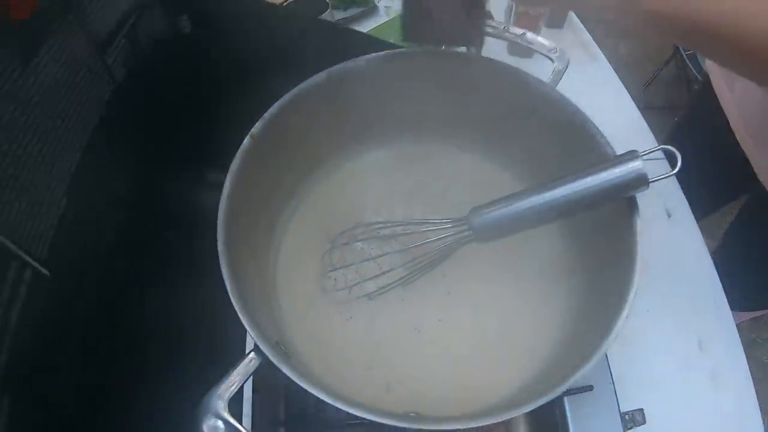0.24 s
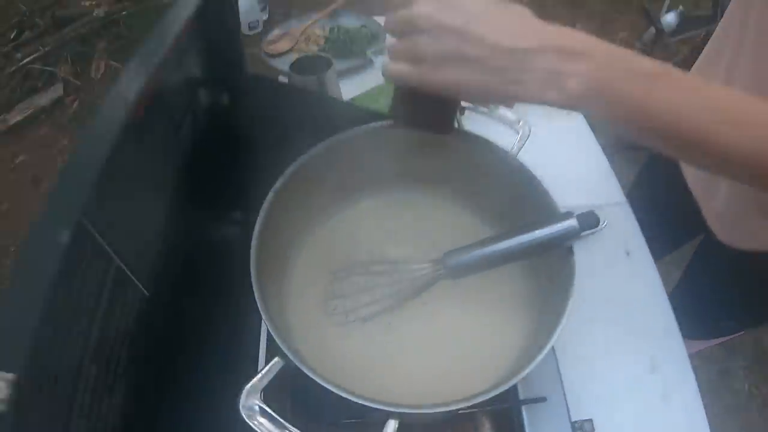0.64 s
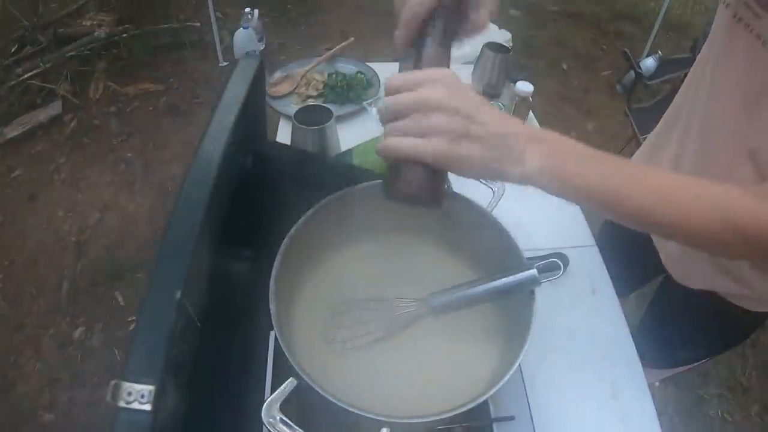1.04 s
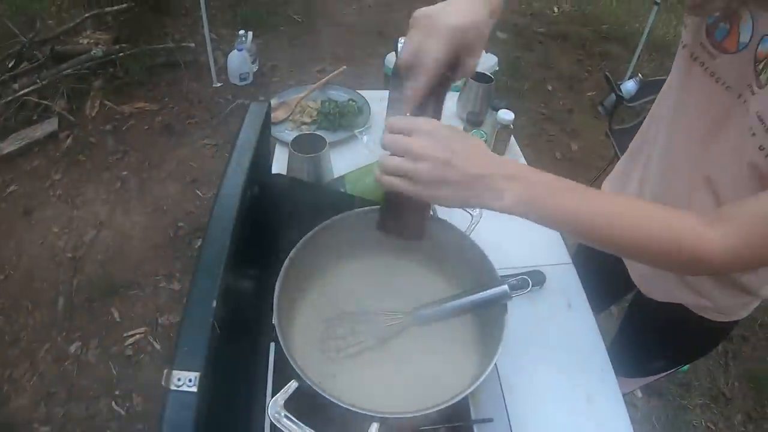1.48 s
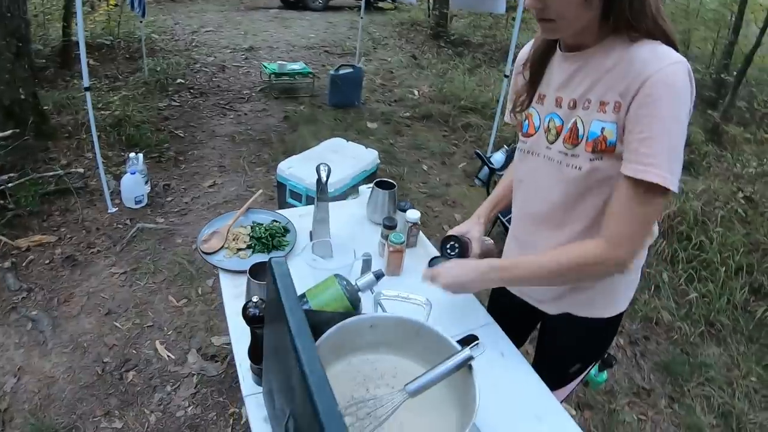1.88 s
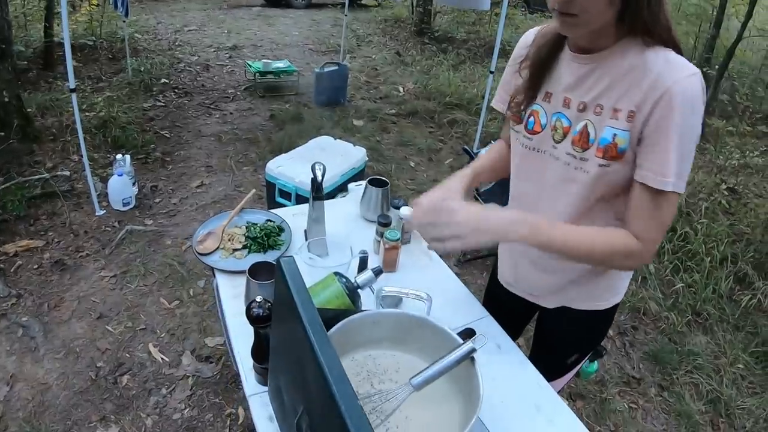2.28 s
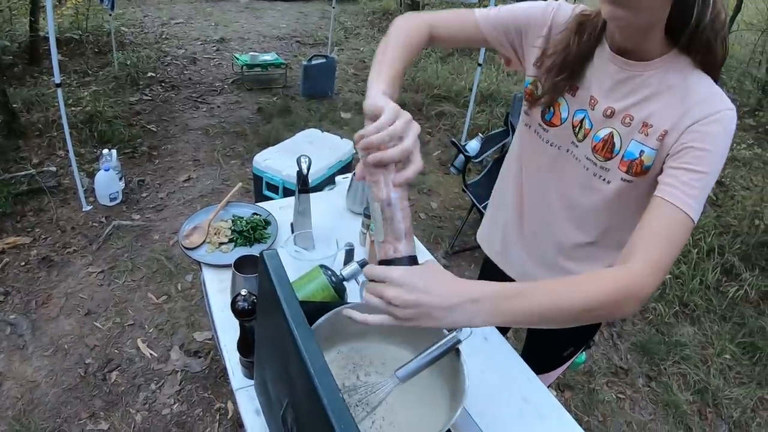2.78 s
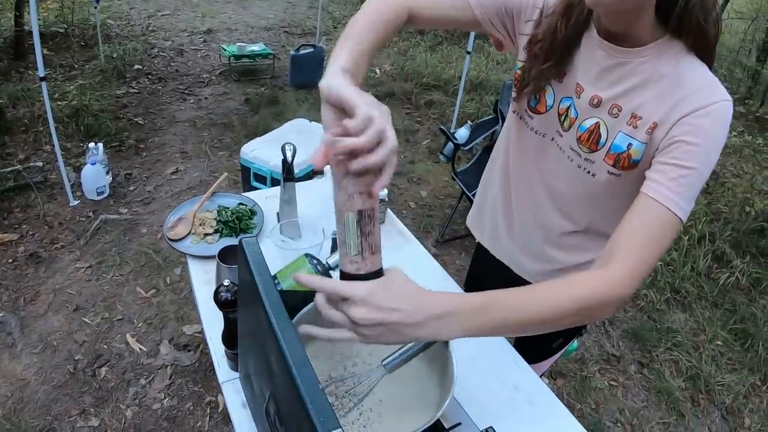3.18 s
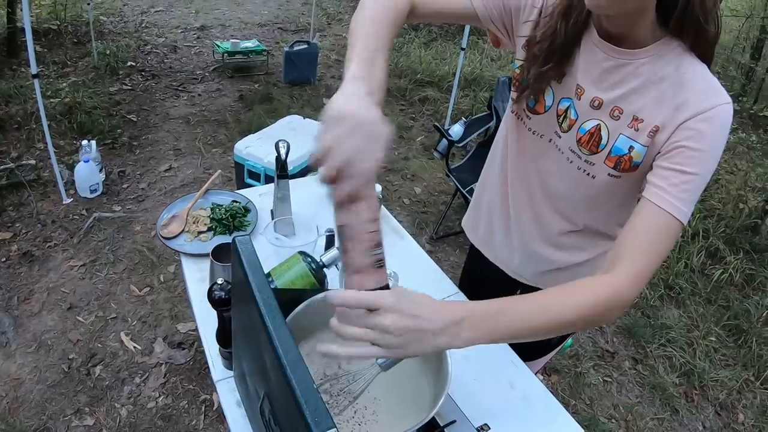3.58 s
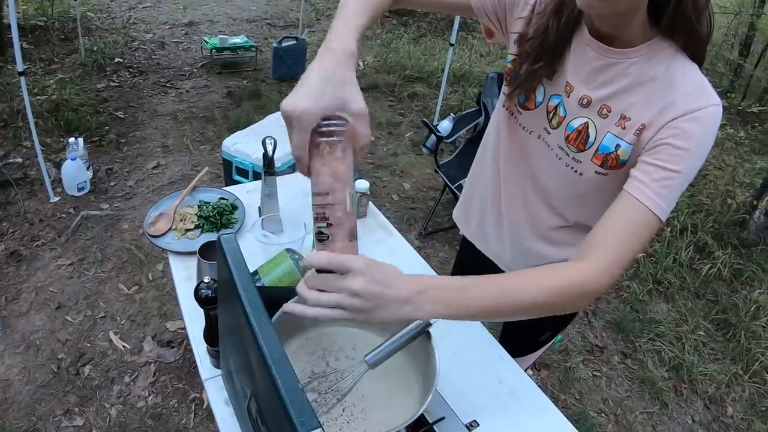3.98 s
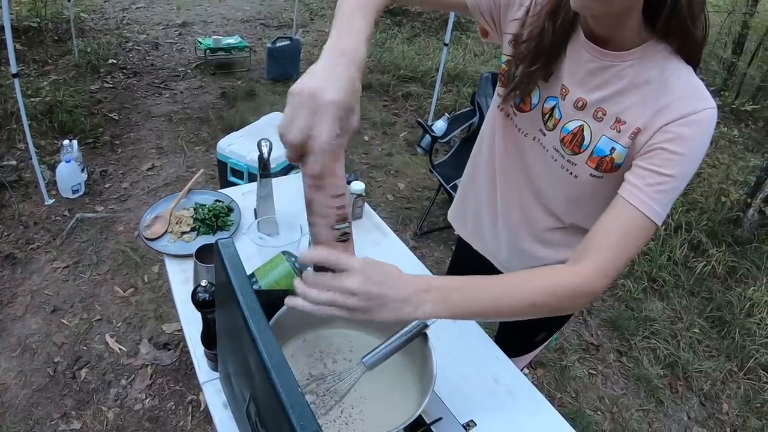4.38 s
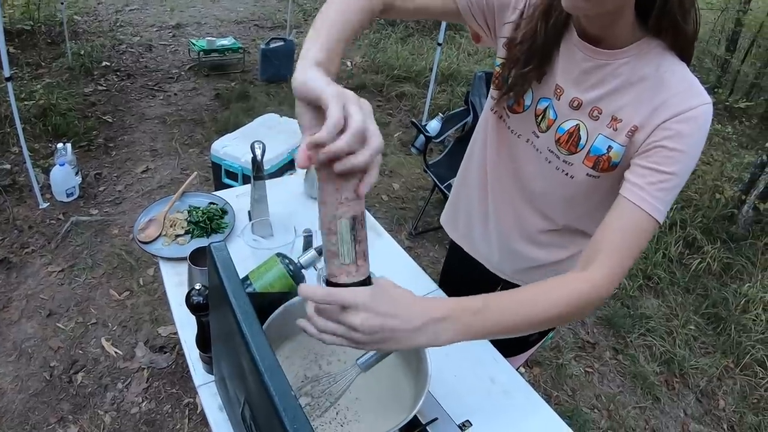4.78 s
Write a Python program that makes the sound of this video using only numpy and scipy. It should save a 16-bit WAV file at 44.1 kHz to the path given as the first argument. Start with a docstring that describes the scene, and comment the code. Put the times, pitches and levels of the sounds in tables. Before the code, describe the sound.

Outdoors beside a faintly hissing stove, quick dry pepper grinds give way to a clack, a small drop and roll, then coarse salt grinding.

```python
"""First a faint stove hiss over a low rumble of outdoor air, then a wooden pepper mill cracks corns in five
short twists and is set down. Something light drops on a folding table, bounces and rolls. A salt mill is tipped
and crushes coarse salt in seven twists while loose crystals slide inside. Air bumps the close microphone.
Crumbs, crystals and hiss are showers of tiny noise bursts; breaks and blows are noise plus ringing tones."""
import sys
import numpy as np
from scipy import signal
from scipy.fft import rfft, irfft
from scipy.io import wavfile

SR = 44100
rng = np.random.default_rng(int(sys.argv[2]) if len(sys.argv) > 2 else 0)


def dump_mix(stems):
    """Bounce the given channels to the path in sys.argv[1] as a 16-bit WAV at rate SR."""
    frames = np.atleast_2d(stems).T  # one column per channel
    limited = np.clip(frames, -1, 1)  # hard clip at full scale
    pcm = np.round(limited * 32767).astype(np.int16)
    wavfile.write(sys.argv[1], SR, pcm)


N = 221860
T = np.arange(N) / SR  # time in seconds

# All dB levels in the tables are relative. A t60 is the time in which a sound fades by 60 dB.
# Sounds are pairs of rows: mid (what left and right share) and side (how they differ).


def undb(db):
    """Turn decibels into a gain."""
    return 10 ** (np.asarray(db) / 20)


def through(x, response):
    """Let a mid and side pair ring through one response (convolution)."""
    return signal.fftconvolve(x, response[None], axes=1)[:, :N]


def colour(x, points, size=4096):
    """Filter through (Hz, dB) points with unit energy and without any sound ahead of the blow."""
    hz, db = np.transpose(points)
    grid = np.maximum(np.arange(size // 2 + 1) * SR / size, 1)
    gain = undb(np.interp(np.log(grid), np.log(hz), db))
    # folding the cepstrum gives minimum phase: the response starts at once
    cepstrum = irfft(np.log(gain))
    cepstrum[1:size // 2] *= 2
    cepstrum[size // 2 + 1:] = 0
    response = irfft(np.exp(rfft(cepstrum)))
    return through(x, response / np.linalg.norm(response))


def shelve(x, points):
    """Weight the frequencies of one channel by (Hz, dB) points."""
    hz, db = np.transpose(points)
    bins_hz = np.arange(N // 2 + 1) * SR / N
    return irfft(rfft(x) * undb(np.interp(bins_hz, hz, db)), N)


def unit(x, band):
    """Scale a pair so that its mid has an rms of 1 within a band in Hz."""
    band_pass = signal.butter(4, band, "band", fs=SR, output="sos")
    return x / np.std(signal.sosfilt(band_pass, x[0]))


def add(track, s, sound):
    """Mix a short sound into a track at a moment in seconds."""
    room = track[..., int(s * SR):][..., :sound.shape[-1]]
    room += sound[..., :room.shape[-1]]


def fade(t60):
    """Half a second of exponential decay."""
    return np.exp(-np.log(1000) * T[:SR // 2] / t60)


def burst(t60):
    """A decaying noise burst whose energy is set by its decay alone; mid and side."""
    noise = rng.standard_normal((2, SR // 2)) * fade(t60)
    return noise * np.linalg.norm(fade(t60)) / np.linalg.norm(noise, axis=1, keepdims=True)


def ring(modes):
    """A struck body answers with a fading sine for each (Hz, dB, t60) mode."""
    return sum(undb(db) * np.sin(2 * np.pi * hz * T[:SR // 2]) * fade(t60) for hz, db, t60 in modes)


def body(x, modes, ring_db):
    """Add to the direct snap the ringing that it starts."""
    response = ring(modes)
    ringing = through(x, response / np.linalg.norm(response))
    return (x + undb(ring_db) * ringing) / np.hypot(1, undb(ring_db))


def grains(per_s, spread_db):
    """Impulses at random moments, many small and a few large."""
    hits = rng.random(N) < per_s / SR
    return hits * undb(spread_db * np.minimum(rng.exponential(size=N), 3.5))


def decaying_power(sizes, t60):
    """Each impulse starts a power that dies away; overlapping ones add up."""
    keep_per_sample = np.exp(-2 * np.log(1000) / (t60 * SR))
    return signal.lfilter([1], [1, -keep_per_sample], sizes ** 2 + 1e-18)


def snaps(sizes, t60, tail_db, tail_t60):
    """Each impulse becomes a short noise burst with a tail of debris; mid and side."""
    power = decaying_power(sizes, t60) + undb(tail_db) ** 2 * decaying_power(sizes, tail_t60)
    return np.sqrt(power) * rng.standard_normal((2, N))


def fractures(events, spectrum, ring_t60, snap_t60, snap_db, tone_db):
    """Each break is a snap of noise and a brief ring at its own pitch and two chance neighbours."""
    noise, tones = np.zeros((2, 2, N))
    neighbours = rng.uniform([.78, 1.08], [.93, 1.33], (len(events), 2))
    for (s, db, hz, _), (below, above) in zip(events, neighbours):
        add(noise, s, undb(db) * burst(snap_t60))
        partials = [(hz, db, ring_t60), (hz * below, db - 4, ring_t60 / 2), (hz * above, db - 3, ring_t60 / 2)]
        soft_start = 1 - fade(.002)
        add(tones[0], s, ring(partials) * soft_start)
    return undb(snap_db) * colour(noise, spectrum) + undb(tone_db) * tones


# The bright tone of the first instant of a blow. Each row: frequency in Hz, level in dB.
EDGE_COLOUR = [(500, -51), (3000, -34), (6000, 18.5), (8000, 9.5), (10500, 10.5), (13500, -4), (15000, -7)]


def edges(events, t60):
    """The first instant of a break or blow is brighter than its ring; rows begin with s and end with dB."""
    out = np.zeros((2, N))
    for s, *_, db in events:
        add(out, s, undb(db) * burst(t60))
    return colour(out, EDGE_COLOUR)


def swells(rows, shape):
    """Gain of (s, length, dB) gestures: each rises, sags while it is held, then dies away."""
    attack, sag_db, release = shape  # seconds per 20 dB, dB per second, seconds per 20 dB
    gains = []
    for s, length, db in rows:
        rise_db = 20 * np.maximum(s - T, 0) / attack
        held_db = sag_db * np.clip(T - s, 0, length)
        fall_db = 20 * np.maximum(T - s - length, 0) / release
        gains.append(undb(db - rise_db - held_db - fall_db))
    return np.max(gains, axis=0)


def waver(per_s, depth_db):
    """A gain that wanders at random, with so many new targets per second."""
    steps = rng.standard_normal(1024)
    return undb(depth_db * np.interp(T * per_s, np.arange(len(steps)), steps))


# The tone of the stove's hiss. Each row: frequency in Hz, level in dB.
STOVE_COLOUR = [(18, -34), (30, -6), (122, -49), (154, 7), (240, 2.5), (267, -5), (754, -1.5), (953, -6.5),
                (3230, 1), (3980, -6), (5170, -2.5), (7630, -11), (15000, -22)]
STOVE_DB, STOVE_FADE_DB_PER_S = -57, 3  # the microphone draws back from the stove


def stove():
    """A dense shower of tiny noise bursts makes a faint, uneven hiss with a fine simmering crackle."""
    hiss = snaps(grains(3000, spread_db=5.0), t60=0.0035, tail_db=0, tail_t60=0.024)
    hiss = unit(colour(hiss, STOVE_COLOUR), (1500, 8000))
    return hiss * undb(STOVE_DB - STOVE_FADE_DB_PER_S * T) * waver(per_s=8, depth_db=2)


# Air bumping the microphone. Each row: start in seconds, length in seconds, level in dB.
GUSTS = [(1.565, 0.024, -48.5), (1.62, 0.009, -37.5), (3.145, 0.13, -43), (3.39, 0.063, -56),
         (4.4, 0.047, -52.5)]
# The low tone of moving air. Each row: frequency in Hz, level in dB.
GUST_COLOUR = [(20, -25), (45, 3.5), (80, -14.5), (150, -14.5), (300, -25.5), (700, -36), (2000, -66)]
GUST_SHAPE = (0.036, 25, .045)  # attack s, sag dB per s, release s
AIR_DB = -85  # faint steady rumble of outdoor air


def gusts():
    """Low bumps of air, mostly on the right port, over a faint rumble; left and right."""
    rumble = unit(colour(rng.standard_normal((2, N)), GUST_COLOUR), (20, 300))
    bumps = np.outer(undb([-14, 3]), rumble[0] * swells(GUSTS, GUST_SHAPE))
    return bumps + undb(AIR_DB) * rumble[1]


def chatter(modes, per_s):
    """Each mode is struck by its own random grains, so the colour shifts from moment to moment."""
    out = np.zeros((2, N))
    for hz, db, t60 in modes:
        # taking the ringing's rate of change keeps the grains free of low thumps
        speed = np.diff(ring([(hz, 0, t60)]), prepend=0)
        rung = through(grains(per_s, spread_db=3.5)[None], speed)[0]
        out[0] += undb(db) * rung / rung.std()
    return out / out[0].std()


WRIST_ARCH = 1.38  # a twist swells and dies as a half sine raised to this power


def arches(rows):
    """Gain of (s, length, dB) turns of the wrist, which speed up and slow down evenly."""
    gain = np.zeros(N)
    for s, length, db in rows:
        progress = np.clip((T - s) / length, 0, 1)
        gain += undb(db) * np.abs(np.sin(np.pi * progress)) ** WRIST_ARCH
    return gain


# Twists of the pepper mill. Each row: start in seconds, length in seconds, level in dB.
PEPPER_TWISTS = [(0.213, 0.12, -26.5), (0.518, 0.126, -21), (0.824, 0.13, -31.5), (1.118, 0.15, -25.5),
                 (1.408, 0.075, -40)]
# The loudest corns that burst. Each row: moment in seconds, level in dB, pitch of its ring in Hz,
# level of its bright edge in dB.
PEPPER_CRACKS = [(0.2255, -18.5, 2320, -56), (0.2407, -12, 3240, -43), (0.2466, -12.5, 2200, -41),
                 (0.2572, -9.5, 5140, -28), (0.2628, -10, 2200, -39), (0.2692, -15, 5470, -46),
                 (0.2837, -8.5, 5280, -41), (0.2944, -9.5, 4330, -22.5), (0.5257, -15.5, 5080, -48),
                 (0.5494, -11, 2340, -37), (0.561, -12.5, 2530, -27.5), (0.5744, -12.5, 2280, -25),
                 (0.582, -24, 2450, -27), (0.8285, -8, 3090, -26), (0.844, -9.5, 2510, -30),
                 (0.8627, -8, 3420, -44), (0.8791, -6, 3555, -26), (0.8828, -6.5, 2820, -27.5),
                 (0.927, -18.5, 2650, -53), (1.1832, -11, 2550, -35), (1.2045, -9.5, 2574, -29),
                 (1.4505, -10.5, 4810, -32)]
# The tone of breaking pepper. Each row: frequency in Hz, level in dB.
PEPPER_COLOUR = [(71, -79), (120, -28), (229, -19), (852, -12.5), (1000, -8.5), (1130, -14.5), (1530, -12),
                 (1910, -15), (2160, -2.5), (2540, 1), (4200, -6), (5350, -5.5), (8520, -26), (10600, -26),
                 (15000, -49)]
# Ringing of the mill's burr and body. Each row: pitch in Hz, level in dB, t60 in seconds.
PEPPER_MODES = [(2088, 21.5, 0.031), (2426, 21, 0.059), (2800, 11, 0.079), (3120, -2, 0.017),
                (3670, -8, 0.029), (4814, 19.5, 0.054), (5100, 0, 0.022)]
# The last crack leaves the burr singing faintly: moment in seconds, then (Hz, dB, t60 s).
PING_S, PING_MODES = 1.451, [(4990, -42, .09)]


def pepper_mill():
    """Husks crumble densely and rattle the burr while the head turns; now and then a whole corn bursts."""
    crumbs = snaps(grains(1500, spread_db=3.5), t60=.005, tail_db=-11, tail_t60=.022)
    crumbs = unit(colour(crumbs, PEPPER_COLOUR), (1500, 7000))
    grind = crumbs + undb(-3) * chatter(PEPPER_MODES, per_s=220)
    corns = fractures(PEPPER_CRACKS, PEPPER_COLOUR, ring_t60=.03, snap_t60=0.015, snap_db=-9, tone_db=-7.5)
    add(corns[0], PING_S, ring(PING_MODES))
    bright_edges = edges(PEPPER_CRACKS, t60=0.027)
    return undb(-3.0) * grind * arches(PEPPER_TWISTS) + corns + undb(-2.5) * bright_edges


# Faint ticks of handling. Each row: moment in seconds, level in dB, pitch of its ring in Hz,
# level of its bright edge in dB.
TICKS = [(0.49, -44, 2290, -64), (0.672, -37.5, 535, -64), (0.97, -33, 2230, -67),
         (1.492, -32.5, 2190, -50), (1.545, -32.5, 2210, -68), (1.614, -44.5, 1300, -66),
         (1.665, -36.5, 2470, -43), (1.708, -39.5, 3340, -46), (1.906, -48, 1970, -46.5),
         (2.027, -29, 3490, -79)]
# Soft bumps of the hand that holds the microphone. Each row: moment in seconds, level in dB.
BUMPS = [(1.559, -52), (1.614, -48), (3.13, -38.5), (3.355, -47)]
# The gritty tone of ticks, and of crushed salt below. Each row: frequency in Hz, level in dB.
CRUSH_COLOUR = [(100, -31), (300, -19.5), (520, -21), (680, -1.5), (900, -0.5), (1200, 4), (1700, 0),
                (3200, 3.5), (4500, -0.5), (6800, -12), (8000, -19.5), (10000, -12), (12000, -23.5),
                (15000, -37)]
# The dull tone of bumps, and of table booms below. Each row: frequency in Hz, level in dB.
BOOM_COLOUR = [(50, -28), (100, -16.5), (160, -2.5), (270, 0), (420, -7), (700, -9.5), (950, -10.5),
               (1400, -13.5), (2500, -23), (6000, -50)]


def handling():
    """Small dry ticks snap and ring briefly; dull bumps are short bursts of low noise."""
    ticks = fractures(TICKS, CRUSH_COLOUR, ring_t60=0.024, snap_t60=0.063, snap_db=-16, tone_db=-7)
    bumps = np.zeros((2, N))
    for s, db in BUMPS:
        add(bumps, s, undb(db) * burst(0.076))
    return ticks + undb(-0.5) * edges(TICKS, t60=0.019) + colour(bumps, BOOM_COLOUR)


# The pepper mill is stood on the table and rocks. Each row: moment in seconds, clack level in dB,
# thump level in dB, level of its bright edge in dB.
SET_DOWN = [(1.8384, -20, -11, -42), (1.8537, -24, -48, -40.5), (1.8572, -12, -30, -41.5),
            (1.868, -20.5, -37, -57)]
# Ringing of the wooden mill. Each row: pitch in Hz, level in dB, t60 in seconds.
WOOD_MODES = [(2260, -14, 0.028), (2250, 7, 0.016), (3110, 1, 0.019), (3780, 4.5, 0.038)]
# The low thump. Each row: pitch in Hz, level in dB, t60 in seconds.
THUMP_MODES = [(208, 5.5, 0.027), (248, -18, 0.037)]
# The tone of a clack, here and in the table's knocks. Each row: frequency in Hz, level in dB.
CLACK_COLOUR = [(76, -39), (130, -2), (282, -0.5), (825, -8), (1380, -8), (2830, 4.5), (3960, -13),
                (4380, -7.5), (5900, -20), (6910, -23.5), (8100, -34), (10500, -27.5), (13600, -56),
                (15000, -63)]


def set_down():
    """The wooden mill lands with a short thump and clacks as it settles; the camp gear echoes faintly."""
    clacks, thumps = np.zeros((2, 2, N))
    for s, clack_db, thump_db, _ in SET_DOWN:
        faint_echo = undb(-28) * burst(.17)
        add(clacks, s, undb(clack_db) * (burst(.014) + faint_echo))
        soft_start = 1 - fade(0.046)
        add(thumps[0], s, undb(thump_db) * ring(THUMP_MODES) * soft_start)
    less_bass = signal.butter(1, 700, "high", fs=SR, output="sos")
    clacks = signal.sosfilt(less_bass, colour(clacks, CLACK_COLOUR))
    clacks = body(clacks, WOOD_MODES, ring_db=-8)
    return undb(-1) * clacks + thumps + edges(SET_DOWN, t60=0.09)


# Something light drops and bounces. Each row: moment in seconds, clack level in dB,
# clack t60 in seconds, boom level in dB.
KNOCKS = [(2.239, -18.5, 0.055, -36.5), (2.2456, -15.5, 0.027, -26), (2.384, -13.5, 0.032, -31),
          (2.4044, -20.5, 0.04, -41.5), (2.415, -27.5, 0.052, -35)]
# Ringing of the hollow table top. Each row: pitch in Hz, level in dB, t60 in seconds.
TABLE_MODES = [(169, -14, 0.33), (270.4, 0, 0.29), (333, -1, 0.25), (417, -2, 0.34), (483, 8, 0.25),
               (705, 8, 0.35), (865, -11, 0.16), (1130, -5, 0.17), (1378, -11, 0.095)]
# The dropped thing rolls. Each row: start in seconds, length in seconds, level in dB.
ROLL = [(2.42, 0.49, -44)]
# The tone of the rolling. Each row: frequency in Hz, level in dB.
ROLL_COLOUR = [(80, -52), (150, -3), (300, 0.5), (550, 1), (900, -10), (2300, -7.5), (4000, -18),
               (9000, -73)]
ROLL_SHAPE = (0.032, 0.59, .13)  # attack s, sag dB per s, release s


def table():
    """Each bounce clacks and booms in the hollow top, whose many modes blur together; then the thing rolls."""
    clacks, booms = np.zeros((2, 2, N))
    for s, clack_db, t60, boom_db in KNOCKS:
        add(clacks, s, undb(clack_db) * burst(t60))
        add(booms, s, undb(boom_db) * burst(.17))
    booms = body(colour(booms, BOOM_COLOUR), TABLE_MODES, ring_db=-17)
    roll = snaps(grains(260, spread_db=2.5), t60=0.0049, tail_db=0, tail_t60=0.12)
    roll = unit(colour(roll, ROLL_COLOUR), (150, 600))
    knocks = undb(-0.5) * colour(clacks, CLACK_COLOUR) + undb(4.5) * booms
    return knocks + roll * swells(ROLL, ROLL_SHAPE)


# The hand stops to regrip after each twist.
PAUSE_AFTER_S, PAUSE_WIDTH_S, PAUSE_DIP_DB = 0.061, 0.027, -9


def pauses(twists):
    """Gain that dips while the hand lets go of the salt mill."""
    stops = [s + length + PAUSE_AFTER_S for s, length, *_ in twists]
    return undb(PAUSE_DIP_DB * sum(np.exp(-((T - s) / PAUSE_WIDTH_S) ** 2) for s in stops))


# Twists of the salt mill. Each row: moment the burrs bite in seconds, length in seconds,
# crushing level in dB, sliding level in dB.
SALT_TWISTS = [(2.995, 0.076, -26, -43), (3.398, 0.064, -27, -39), (3.728, 0.056, -25, -38),
               (4.055, 0.054, -24.5, -35.5), (4.364, 0.072, -30.5, -37.5), (4.668, 0.084, -27, -37.5),
               (4.985, 0.08, -26, -33.5)]
# The clearest crystals that split. Each row: moment in seconds, level in dB, pitch of its ring in Hz,
# level of its bright edge in dB.
SALT_CRACKS = [(2.685, -17.5, 2200, -49), (2.81, -18.5, 4650, -32), (2.854, -17, 5400, -33),
               (2.991, -4, 3700, -35), (3.002, -6, 3760, -30), (3.027, -13.5, 1900, -22.5),
               (3.07, -10, 3030, -20), (3.157, -33, 3000, -43), (3.252, -19, 4500, -31),
               (3.416, -19, 3100, -41), (3.561, -20, 4000, -56), (3.726, -11.5, 2680, -31),
               (3.77, -5.5, 3280, -20), (3.992, -26, 3280, -29), (4.066, -15, 1140, -33),
               (4.376, -4, 3200, -45), (4.61, -20.5, 3450, -43), (4.652, -6.5, 2860, -34),
               (4.705, -4.5, 3100, -20), (4.821, -13, 3190, -49), (4.886, -18.5, 5740, -22.5),
               (4.935, -17, 3360, -23)]
# Crystals pour down the tube as the mill is tipped or shaken. Each row: start in seconds,
# length in seconds, level in dB.
POURS = [(2.625, 0.05, -46.5), (2.852, 0.062, -41), (3.235, 0.02, -41.5)]
# The tone of sliding crystals. Each row: frequency in Hz, level in dB.
SLIDE_COLOUR = [(200, -24.5), (500, -35), (700, -21), (1400, -13.5), (2200, -4.5), (3300, 1.5),
                (5500, -0.5), (7000, -4), (7900, -14), (9000, -4.5), (10300, -5.5), (11600, -18.5),
                (13800, -20), (15500, -45)]
# Ringing of the mill's tube. Each row: pitch in Hz, level in dB, t60 in seconds.
SALT_MODES = [(708.5, 10, 0.014), (1120, -0.5, 0.021), (2680, -5, 0.0078), (3456, -5.5, 0.057)]
CRUSH_SHAPE, SLIDE_SHAPE = (0.016, 46, 0.057), (0.064, 5, 0.11)  # attack s, sag dB per s, release s
SLIDE_LEAD_S = 0.037  # loose crystals shift just before the burrs bite
REGRIP_CRUSH_DB, REGRIP_SLIDE_DB = -48, -47  # between twists the mill keeps rustling


def salt_mill():
    """Burrs crush crystals into the tube's resonances, more the harder the twist; loose ones slide and hiss."""
    in_use = np.clip((T - SALT_TWISTS[0][0]) / CRUSH_SHAPE[0], 0, 1) * pauses(SALT_TWISTS)

    twist = swells([(s, length, db) for s, length, db, _ in SALT_TWISTS], CRUSH_SHAPE)
    twist = np.hypot(twist, undb(REGRIP_CRUSH_DB) * in_use * waver(per_s=25, depth_db=3))
    density = 300 + 1400 * np.sqrt(twist / twist.max())  # crystals per second
    # dividing by the root of the density keeps the power even; the twist alone sets the level
    crystals = grains(density, spread_db=4.5) / np.sqrt(density)
    crush = colour(snaps(crystals, t60=.003, tail_db=-12, tail_t60=.02), CRUSH_COLOUR)
    crush = unit(body(crush, SALT_MODES, ring_db=-12.0), (600, 2500))

    cracks = fractures(SALT_CRACKS, CRUSH_COLOUR, ring_t60=.017, snap_t60=.009, snap_db=-10, tone_db=-11)
    cracks = cracks + undb(-5.0) * edges(SALT_CRACKS, t60=0.028)

    slides = [(s - SLIDE_LEAD_S, length + SLIDE_LEAD_S, db) for s, length, _, db in SALT_TWISTS]
    flow = swells(slides + POURS, SLIDE_SHAPE)
    flow = np.hypot(flow, undb(REGRIP_SLIDE_DB) * in_use) * waver(per_s=22, depth_db=1.5)
    slide = snaps(grains(2200, spread_db=4.5), t60=.002, tail_db=-11, tail_t60=.012)
    slide = unit(colour(slide, SLIDE_COLOUR), (8000, 12000))
    return undb(-2.5) * crush * twist + cracks + undb(-2.0) * slide * flow


# How wide the sound spreads. Each row: frequency in Hz, gain of the side in dB.
WIDTH = [(100, -12), (300, -12.5), (600, -9.5), (1300, -7), (2500, -13.5), (3800, -15.5), (5500, -5.5),
         (7000, -3.5), (8000, 0), (9500, -5), (12000, 2), (15000, -5)]
# How the sound leans to one ear. Each row: frequency in Hz, left gain minus right gain in dB.
LEAN = [(200, 0), (1000, -.5), (3000, 0), (5500, -1.5), (7000, -3), (8100, 0), (9000, -0.5), (10800, -3),
        (12000, -0.5)]


def scene():
    """Mix all sources; the two close ports agree in the lows and part in the treble."""
    mid, side = stove() + pepper_mill() + handling() + set_down() + table() + salt_mill()
    side = shelve(side, WIDTH)
    left = shelve(mid + side, [(hz, db / 2) for hz, db in LEAN])
    right = shelve(mid - side, [(hz, -db / 2) for hz, db in LEAN])
    # the small ports pass little airborne bass
    less_bass = signal.butter(1, 70, "high", fs=SR, output="sos")
    return signal.sosfilt(less_bass, [left, right]) + gusts()


def record(dry):
    """Round the tallest peaks softly and cut the treble above 15.1 kHz."""
    rounded = np.tanh(1.245 * dry) / 1.212
    top_cut = signal.ellip(8, .2, 70, 15100, fs=SR, output="sos")
    return signal.sosfilt(top_cut, rounded)


dry = scene()
out = record(dry)
dump_mix(out)
```